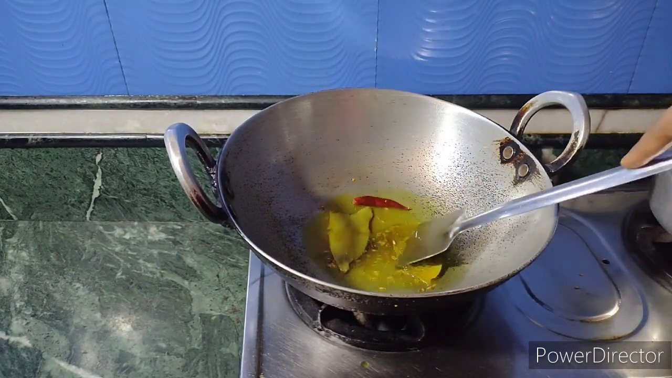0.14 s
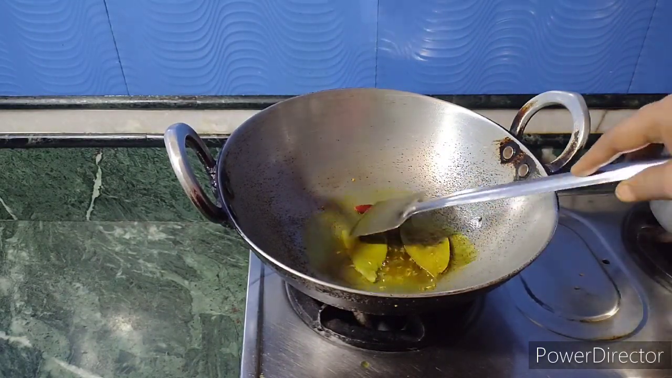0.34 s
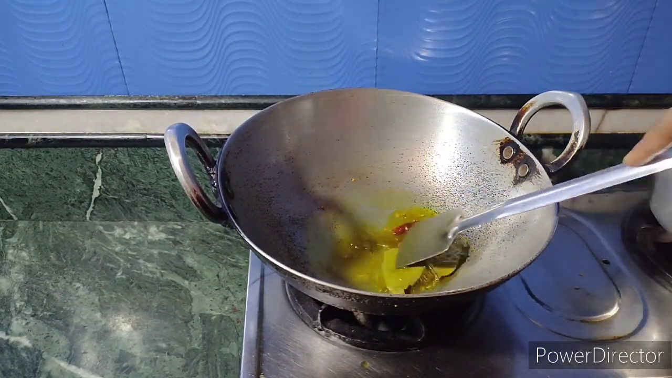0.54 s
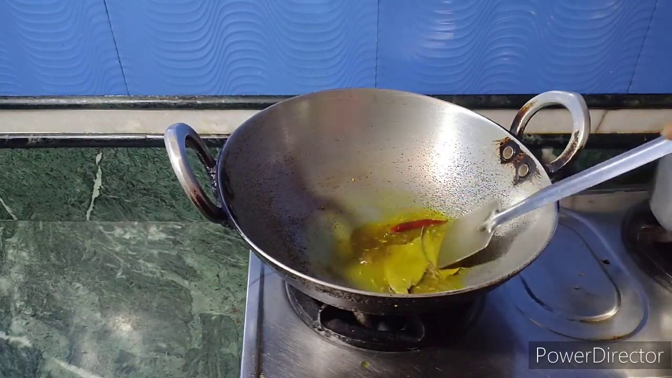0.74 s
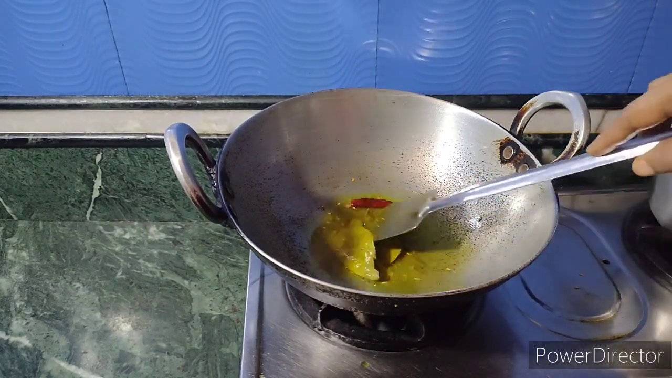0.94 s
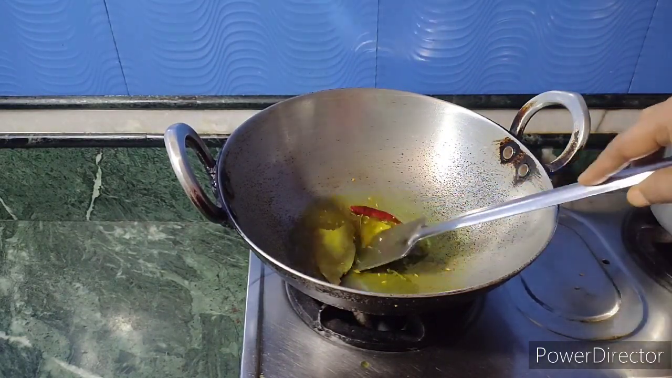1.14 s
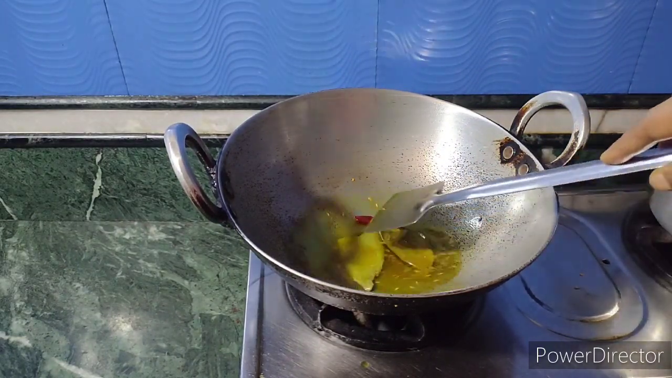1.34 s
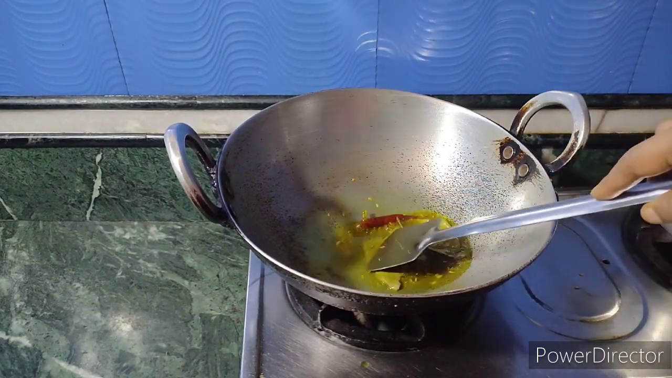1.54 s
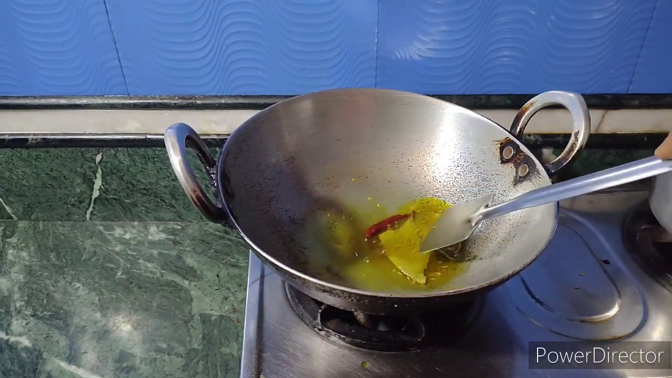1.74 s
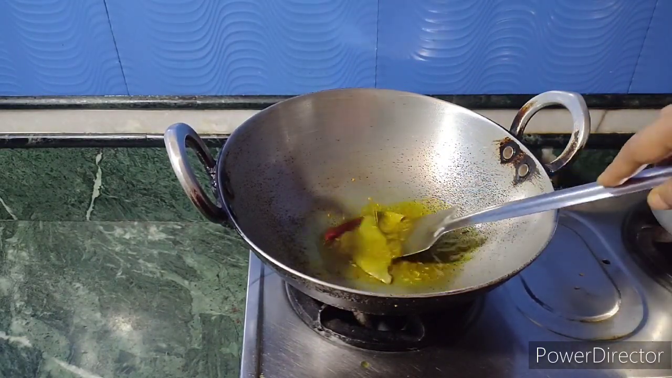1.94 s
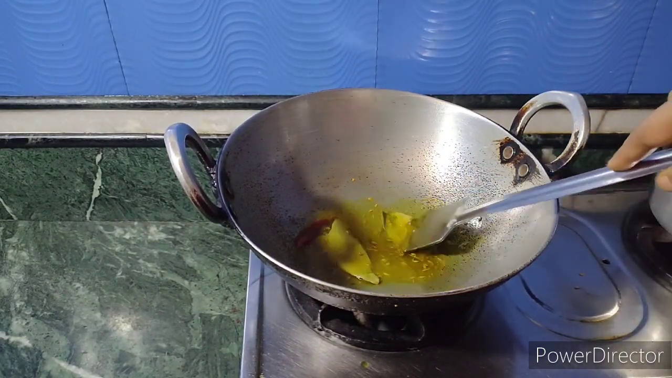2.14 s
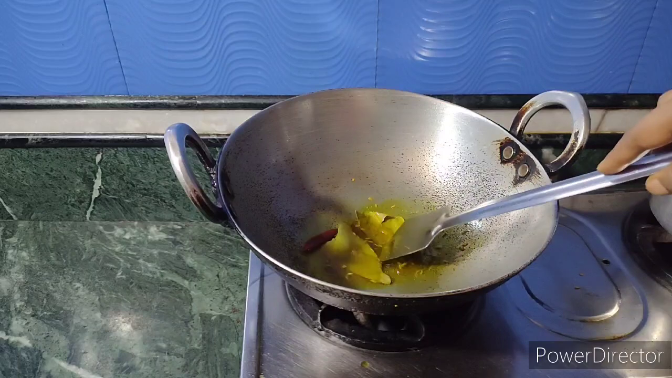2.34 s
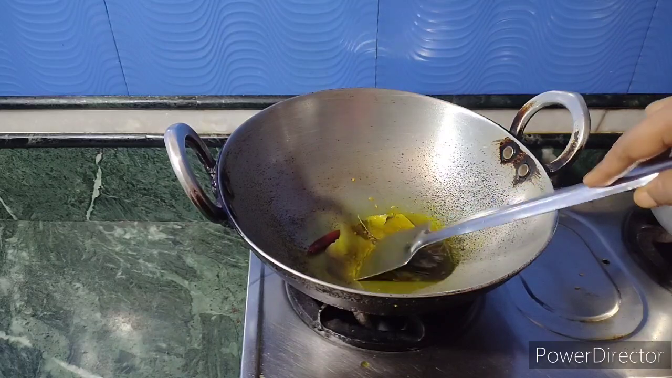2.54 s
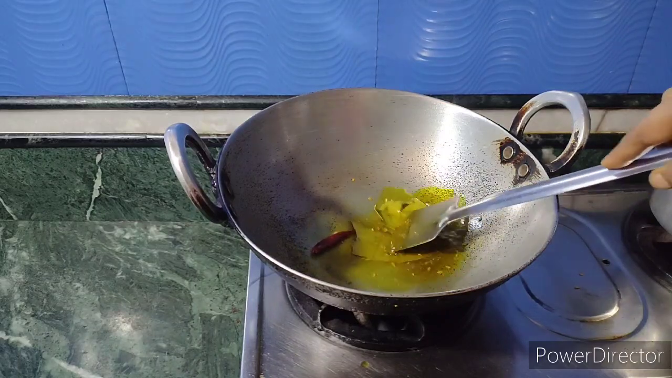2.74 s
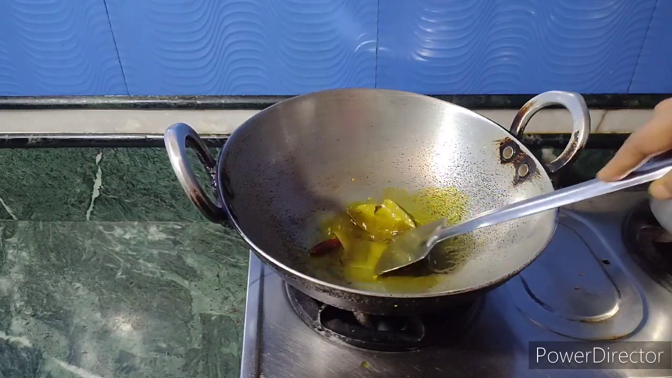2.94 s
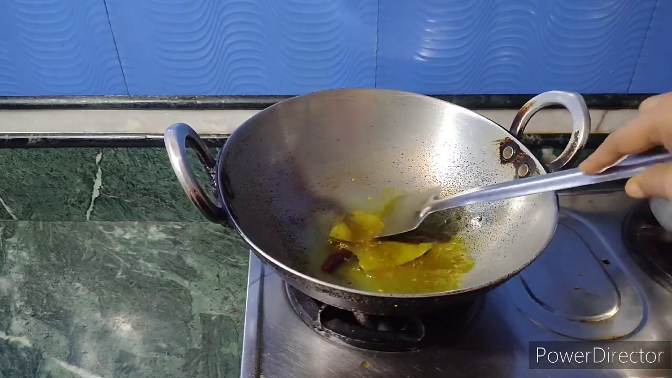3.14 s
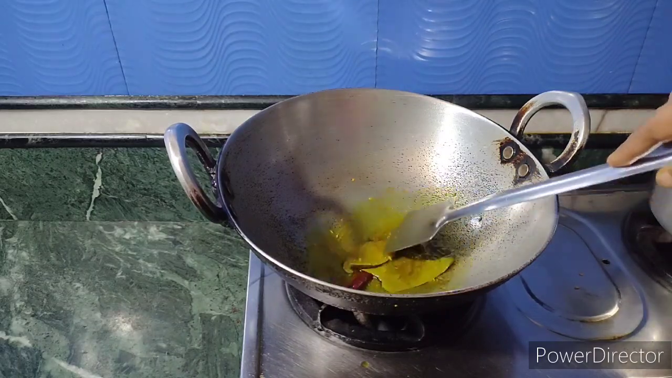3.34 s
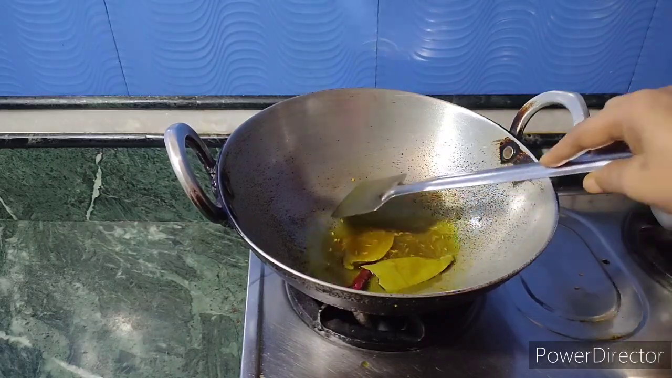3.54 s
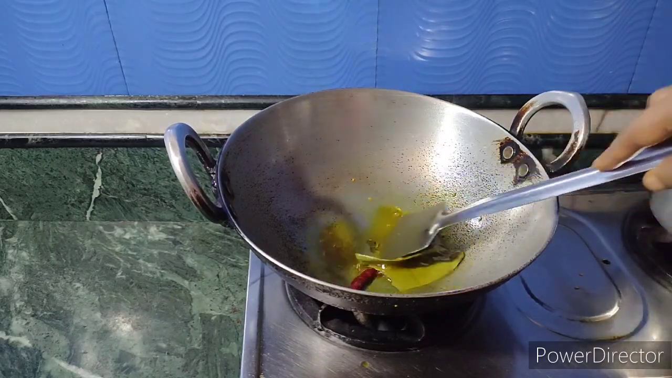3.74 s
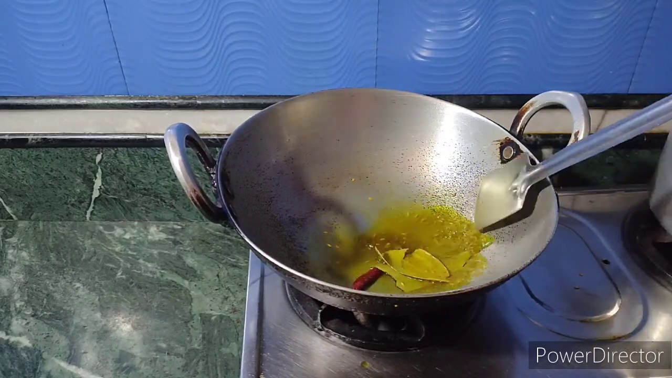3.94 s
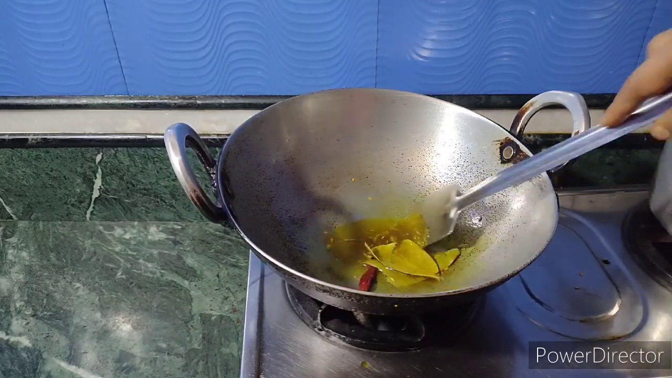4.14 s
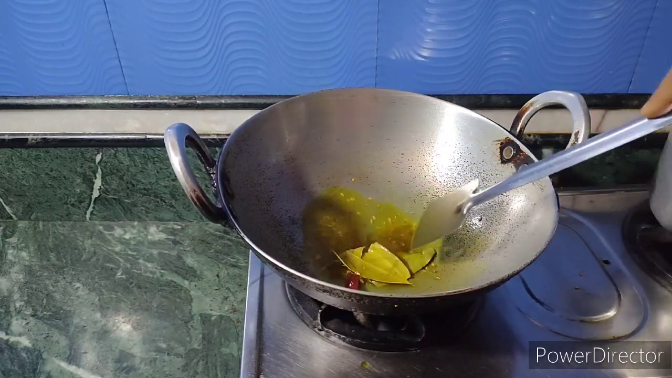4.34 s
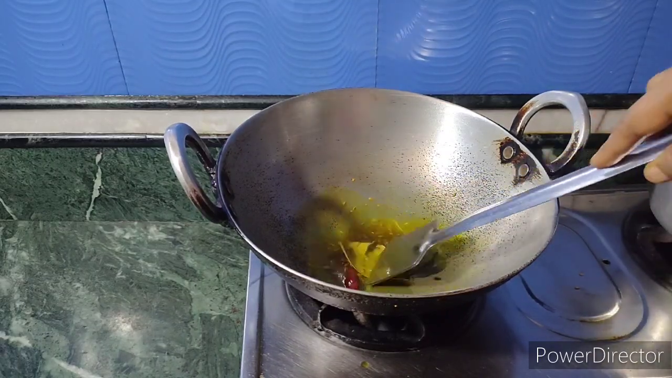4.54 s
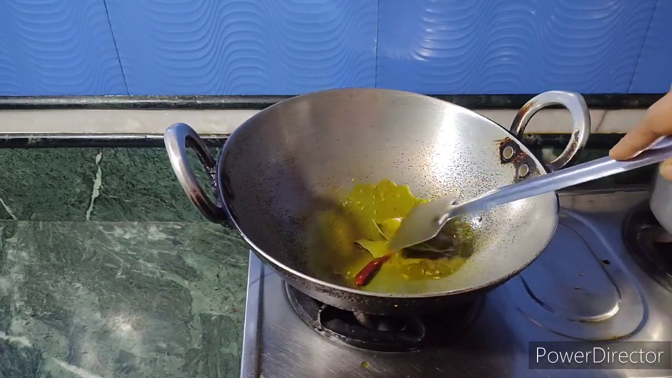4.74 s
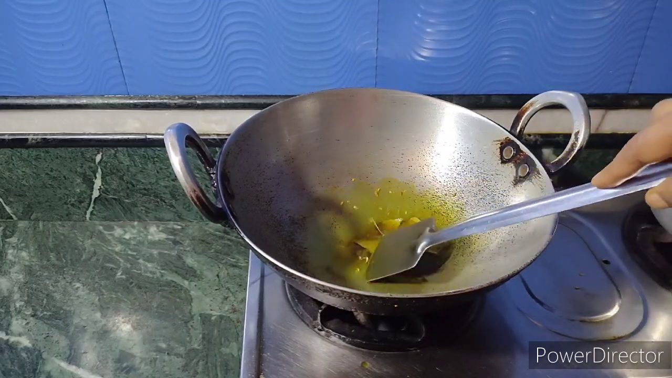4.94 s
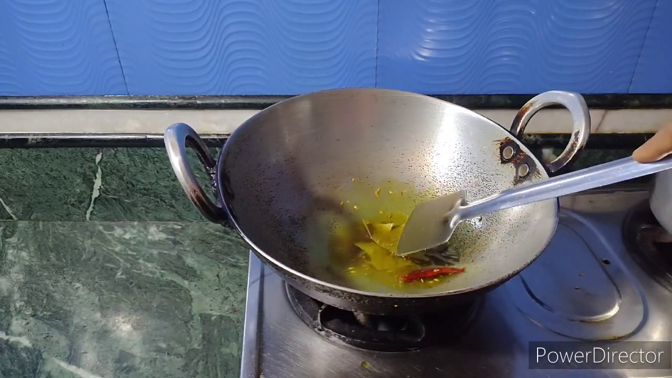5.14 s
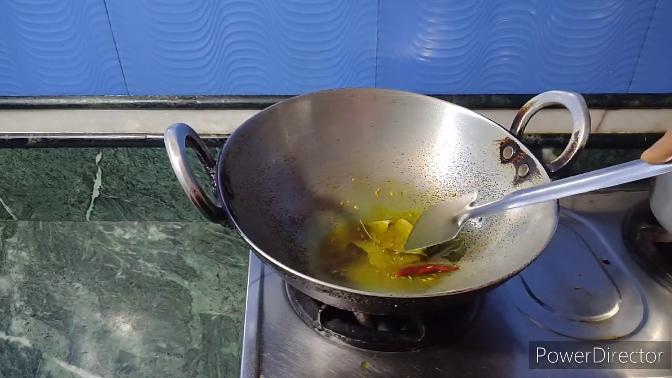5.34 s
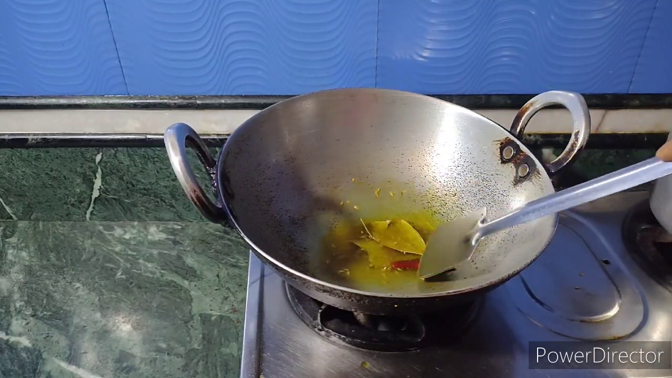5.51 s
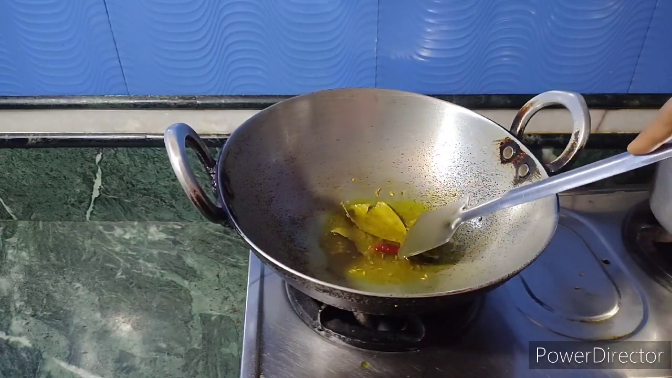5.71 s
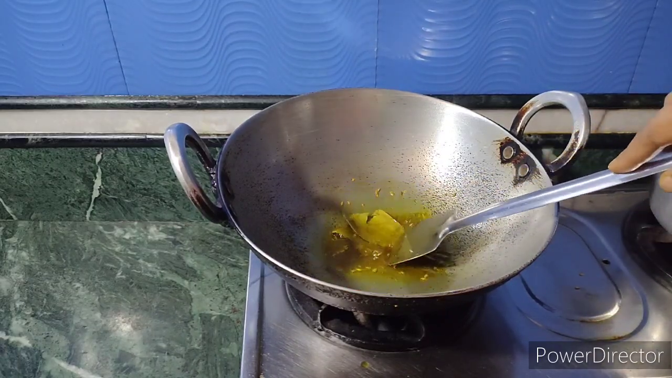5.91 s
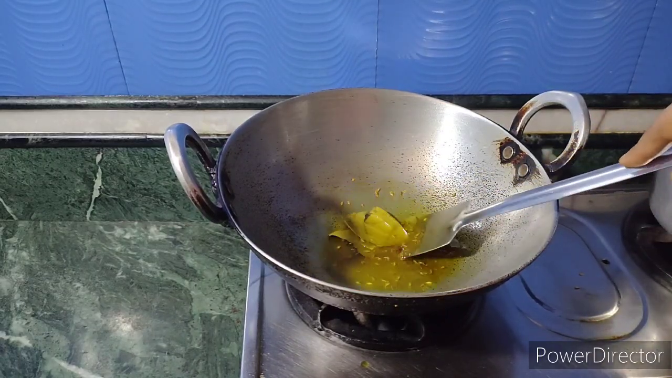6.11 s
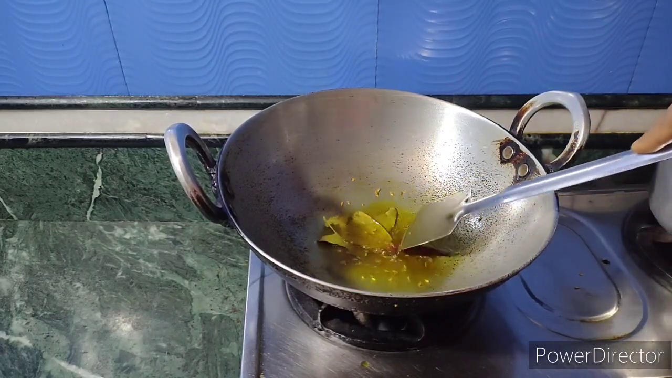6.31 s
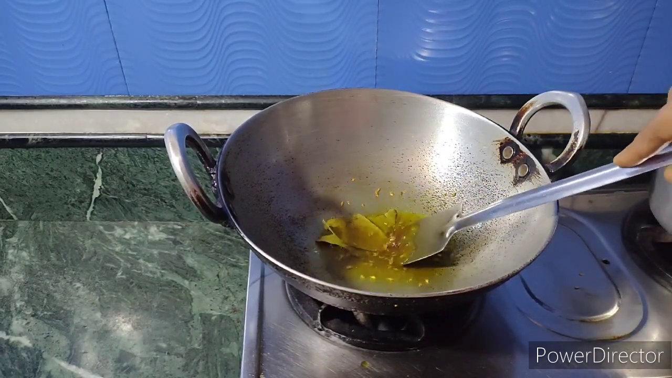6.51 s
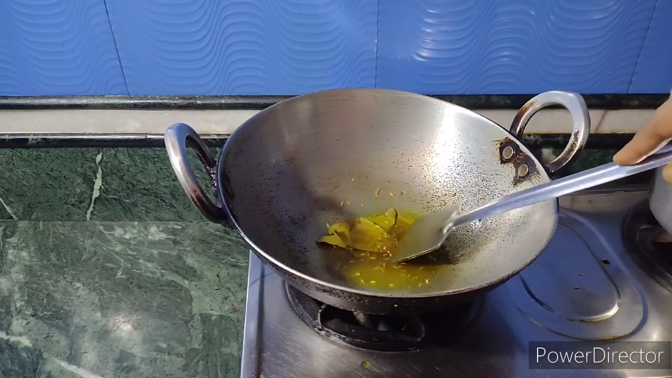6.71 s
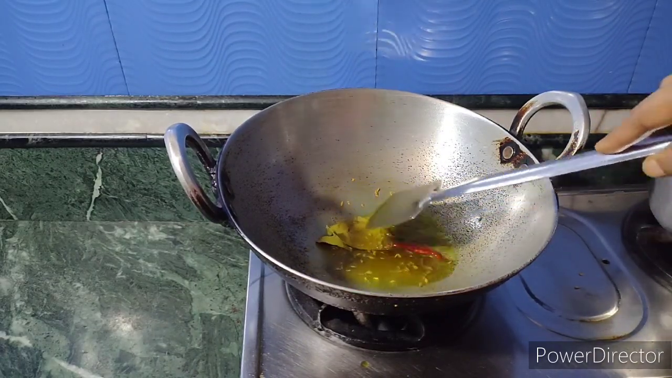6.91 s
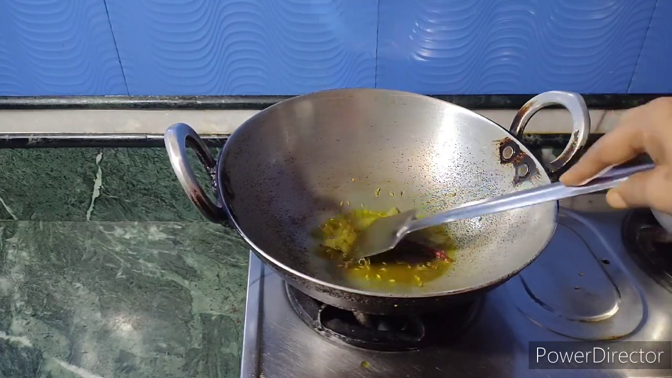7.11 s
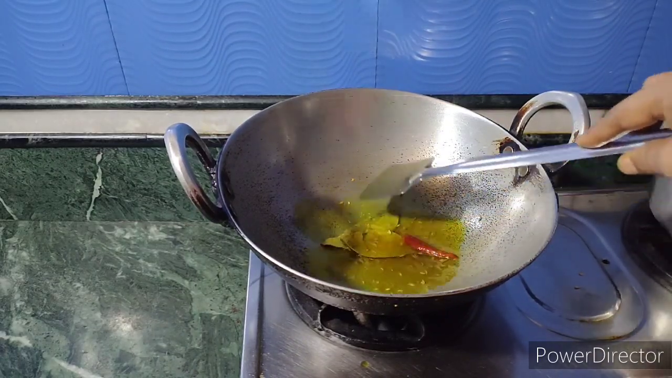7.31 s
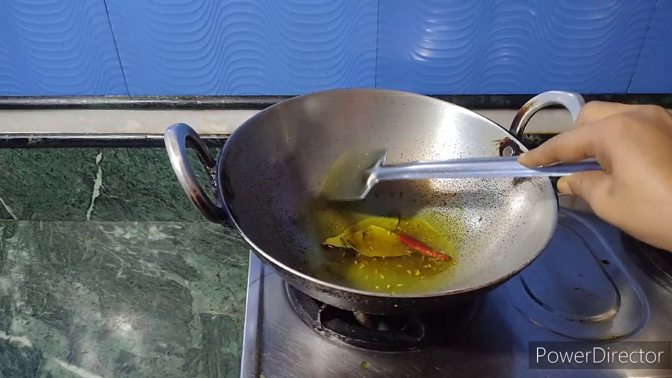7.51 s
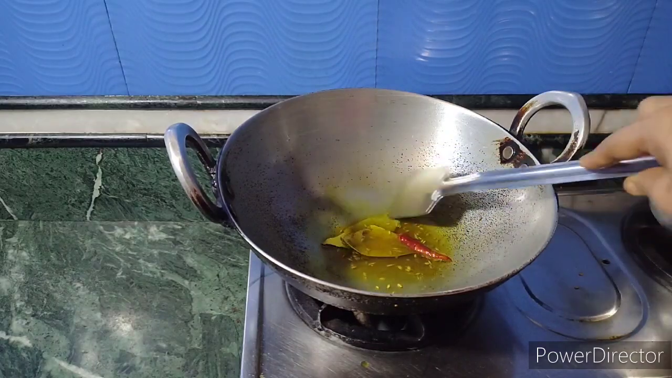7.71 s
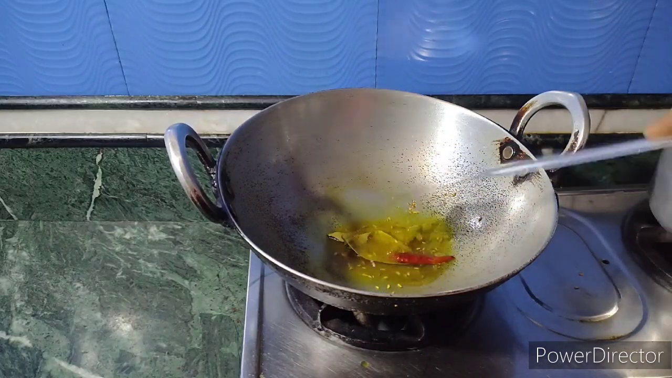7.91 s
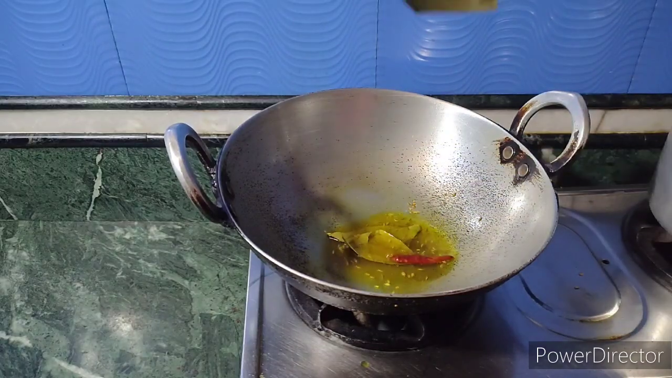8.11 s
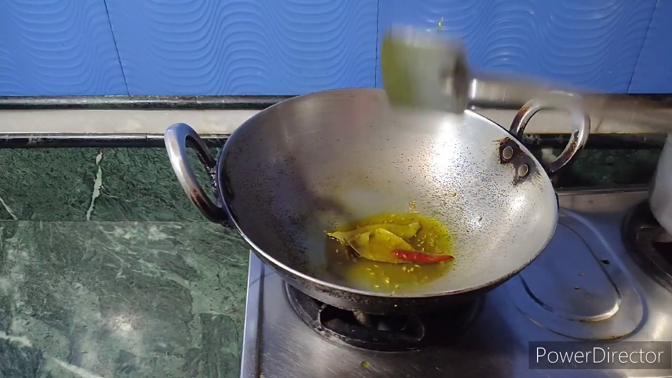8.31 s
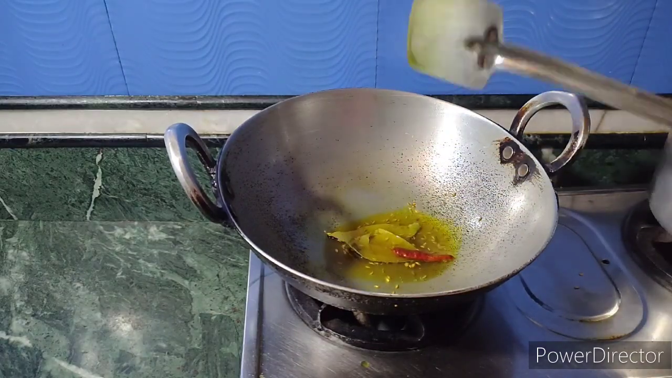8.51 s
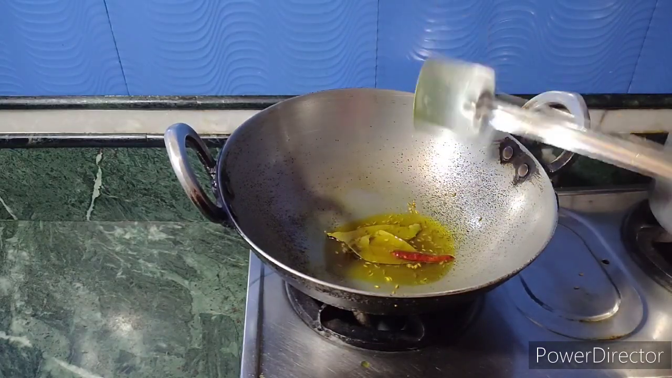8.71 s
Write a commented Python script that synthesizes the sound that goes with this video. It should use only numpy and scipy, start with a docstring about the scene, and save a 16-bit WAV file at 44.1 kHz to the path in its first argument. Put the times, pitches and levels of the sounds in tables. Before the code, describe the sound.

Frying is already under way at 0 s: a dense, bright, crisp sizzle of fine fizz and larger bubbles, with deep wet splutters and seed snaps in the first second. A short dry scrape opens it, and soft low metallic hums from the rubbing spatula appear until about 2.2 s. A dull, hollow knock falls at 1.6 s, clearer clinks at 2.7 and 3.2, a strong bright clank at 3.7, and a close pair around 4.1 with a scrape. Further taps come at 5.0, 5.4, 5.7, a faint one at 6.2, and 6.6, with faint oily swishes between 4.6 and 7.5. Meanwhile the sizzle thins into separate crackling pops. The strongest knock, at 7.7, rings more freely and runs into a rasping scrape and low hum until 8. Then only sparse tiny pops remain over very faint room noise and hum. Close stereo, small kitchen, short metallic echo.

```python
"""A dense sizzle comes first: spices fry in a little oil in a steel wok, then thin out into single pops.
Fizz, bubbles and splutters are many tiny damped tones; seeds snap as short bursts of coloured noise.
A steel spatula knocks, rubs and scrapes: noise bursts, ringing steel modes, tiny slips and gliding hums.
Fading noise stands for the echo of wok and kitchen; faint room noise and mains hum lie underneath.
Two close microphone ports (left and right) colour the treble differently."""
import sys
import numpy as np
from scipy import signal
from scipy.fft import rfft, irfft, next_fast_len
from scipy.io import wavfile
from scipy.ndimage import uniform_filter1d

SR = 44100
rng = np.random.default_rng(int(sys.argv[2]) if len(sys.argv) > 2 else 0)


def unload_audio(sound):
    """Save the sound as a 16-bit wav file, at the path given as the first command line argument."""
    columns = np.transpose(np.atleast_2d(sound))
    # keep every value between -1 and 1, then stretch to whole-number steps
    steps = np.round(np.clip(columns, -1, 1) * 32767)
    wavfile.write(sys.argv[1], SR, steps.astype(np.int16))


N = 386316  # length in samples

# How hard the water boils out of the spices: t/s, level/dB
BOIL = [(0.0, -47), (1.61, -51), (3.68, -53), (4.17, -52), (4.68, -59), (5.0, -53), (5.41, -61),
        (5.63, -66), (5.8, -57), (6.17, -64), (6.4, -60), (6.78, -62), (7.07, -71), (7.41, -59),
        (7.66, -73), (7.91, -58), (8.2, -74.5), (8.76, -80)]
FULL_BOIL_DB = -47
# Tone colour of fine fizz, larger bubbles, deep splutters and steady hiss: f/Hz, level/dB (per Hz)
FIZZ_COLOUR = [(2500, -37.5), (4200, -11.5), (4800, -3), (6000, -5), (6800, -1.5), (8400, -4), (9500, -8),
               (11000, -12), (13000, -7.5), (15500, -8)]
BUBBLE_COLOUR = [(300, -23.5), (650, -25), (850, -43), (1300, -26), (1600, -7), (1900, 1), (2400, 3),
                 (3200, 6.5), (3900, 6.5), (5000, -18.5)]
SPLUTTER_COLOUR = [(300, -26.5), (600, -18.5), (720, -14), (840, 1.5), (1000, -9), (1300, 1.5), (1700, 3),
                   (2500, -13.5)]
HISS_COLOUR = [(1500, -26.5), (4200, -18), (7300, 1), (12000, -21)]
# A weak boil fizzes less and pops more: offset from full boil (dB), dB lost per dB of boil
FIZZ_OFFSET_DB, FIZZ_FALL = 3.5, 1.17
# Bigger bubbles need more water, so they die away sooner: level at full boil (dB), dB lost per dB of boil
BUBBLE_DB, BUBBLE_FALL = -51.5, 1.6
SPLUTTER_DB, SPLUTTER_FALL = -63, 3.5


def sizzle():
    """Water boils out of the spices: fine fizz, larger bubbles, deep splutters and a faint steady hiss."""
    boil_db, = curves(BOIL)
    drop_db = boil_db - FULL_BOIL_DB
    fizz_db = FULL_BOIL_DB + FIZZ_OFFSET_DB + FIZZ_FALL * drop_db
    fine = bubbles(fizz_db, most_per_s=480, pitch_hz=7300, spread=0.22,
                   cycles=3, size_db=4.5, spectrum=FIZZ_COLOUR)
    large = bubbles(BUBBLE_DB + BUBBLE_FALL * drop_db, most_per_s=380, pitch_hz=2370, spread=0.28,
                    cycles=1.96, size_db=3.0, spectrum=BUBBLE_COLOUR)
    deep = bubbles(SPLUTTER_DB + SPLUTTER_FALL * drop_db, most_per_s=60, pitch_hz=1200, spread=0.33,
                   cycles=1.5, size_db=5, spectrum=SPLUTTER_COLOUR)
    hiss = amp(-74) * unit(coloured(rng.standard_normal((2, N)), HISS_COLOUR))
    return fine + large + deep + hiss


def bubbles(level_db, most_per_s, pitch_hz, spread, cycles, size_db, spectrum, count=160):
    """Many tiny bursts, each a few damped cycles (count samples long); quieter frying has fewer of them."""
    level_db = np.pad(level_db, (SR // 2, 0), "edge")  # the oil is already frying
    n = len(level_db)
    rate = most_per_s * amp(level_db - level_db.max()) ** 0.7
    start = np.flatnonzero(rng.random(n) < rate / SR)
    draw = rng.standard_normal((len(start), 3))  # pitch, size, place
    hz = np.clip(pitch_hz * np.exp(spread * draw[:, :1]), 500, 15000)
    size = amp(level_db[start] + size_db * np.clip(draw[:, 1], -2, 1.5)) / np.sqrt(rate[start])
    turns = hz * np.arange(count) / SR
    tones = np.sin(2 * np.pi * turns) * np.exp(-turns / cycles)
    grains = size[:, None] * np.sqrt(hz) * tones
    out = np.zeros((2, n))
    # three spots in the oil, each with its own echo
    for spot in np.array_split(np.argsort(draw[:, 2]), 3):
        places = (start[spot, None] + np.arange(count)).ravel()
        dry = np.bincount(places, grains[spot].ravel(), n + count)[None, :n]
        echo = answer(direct=11, wok_t60=0.1, room_db=-8, room_t60=0.45)
        out += signal.oaconvolve(dry, echo, axes=1)[:, :n]
    overall = np.sqrt(np.mean(amp(level_db) ** 2))
    return (unit(coloured(out, spectrum)) * overall)[:, -N:]


# Bubbles that stand out of the sizzle: t/s, level/dB (before a 4 dB lift), f/Hz
BIG_POPS = [(.12, -65, 6740), (.4988, -59, 6900), (.535, -48.5, 6600), (.6404, -44.5, 2000),
            (.8144, -50, 2900), (.9063, -44.5, 6560), (1.0115, -49, 1890), (1.107, -45.5, 6400),
            (1.2667, -49, 3000), (1.272, -45, 6600), (1.3898, -50, 3160), (1.6972, -53, 2100),
            (2.2545, -45, 6700), (2.3734, -51, 2100), (2.5202, -48, 6550), (2.7869, -44, 6840),
            (3.3454, -49, 6400), (3.477, -50.5, 8400), (3.521, -52, 6900), (3.567, -49, 7240),
            (3.8724, -47, 5550), (4.0488, -44.5, 6800), (4.4693, -51, 6940), (4.5053, -50.5, 7650),
            (4.592, -51.5, 8030), (4.6145, -49.5, 6800), (4.7332, -52, 5600), (4.7496, -54.5, 3400),
            (4.8929, -48.5, 6340), (4.9516, -50, 6500), (4.972, -55, 3860), (5.155, -51, 7760),
            (5.39, -49, 6530), (5.798, -51.5, 6450), (6.03, -51, 7300), (6.054, -53.5, 2310),
            (6.192, -51.5, 6500), (6.2934, -55.5, 6540), (6.432, -56.5, 4850), (6.5332, -52.5, 6840),
            (6.759, -53.5, 7350), (6.8854, -52.5, 6200), (6.9845, -56.5, 6300), (7.1204, -55.5, 2430),
            (7.1447, -50.5, 6360), (7.2973, -53, 3100), (7.3304, -54, 7950), (7.365, -53.5, 5070),
            (7.4121, -50.5, 6560), (7.5645, -49.5, 7670), (7.9778, -53, 7650), (8.0546, -52, 8340),
            (8.5925, -59.5, 4140)]
# Dry snaps of spitting seeds: t/s, level/dB (before an 18.5 dB cut)
SEED_SNAPS = [(0.077, -29), (0.3213, -27), (3.55, -29.5), (5.339, -39), (6.389, -35), (6.8364, -40),
              (8.2081, -42)]
# The loudest deep splutters from under the leaves: t/s, level/dB, f/Hz
LEAF_SPLUTTERS = [(0.016, -55, 840), (.076, -51.5, 990), (0.3223, -51, 1590), (0.641, -57, 850),
                  (.934, -58, 1450), (2.919, -54.5, 1530), (3.1, -58, 1210)]
# Tone colour of a pop in the wok: f/Hz, level/dB (per Hz)
POP_COLOUR = [(1300, -32.5), (1900, 0.5), (3300, 3), (4000, -6), (5000, 2.5), (8500, 8), (11000, -10)]
# Tone colour of a sharp crack, for seeds and steel alike: f/Hz, level/dB (per Hz)
CRACK_COLOUR = [(2500, -32.5), (4100, -14.5), (4900, -1.5), (6000, 0), (7400, 1.5), (8600, 0), (10500, -12),
                (15500, -18.5)]


def pops():
    """A big bubble tears open and briefly rings at its cavity's pitch; a seed snaps; a leaf splutters."""
    out, t = np.zeros((2, N)), seconds(0.01)
    for s, db, hz in [*BIG_POPS, *stray_pops()]:
        cavity = np.cos(2 * np.pi * hz * t) * np.exp(-t / 0.00048)
        echo = answer(direct=3, wok_t60=0.075, room_db=-9, room_t60=0.48)
        pop = coloured(signal.fftconvolve(echo, cavity[None], axes=1), POP_COLOUR)
        add(out, s, amp(db + 4.0) * struck(pop))
    for s, db in SEED_SNAPS:
        echo = answer(direct=9, wok_t60=0.04, room_db=-9, room_t60=0.45)
        add(out, s, amp(db - 18.5) * struck(coloured(echo, CRACK_COLOUR)))
    for s, db, hz in LEAF_SPLUTTERS:
        echo = answer(direct=3.1, wok_t60=0.053, room_db=-3.0, room_t60=0.38)
        splat = coloured(echo, SPLUTTER_COLOUR)
        splat = filtered(splat, lambda f: amp(favour(f, hz, boost_db=6, octaves=0.45)))
        add(out, s, amp(db) * struck(splat))
    return out


# Stray pops: rate at full boil, level against the boil (before the pops' 4 dB lift) and its scatter
STRAY_PER_S, STRAY_DB, STRAY_SCATTER_DB = 6, -1, 1.5
# Their middle pitch and its relative spread
STRAY_HZ, STRAY_SPREAD = 6470, 0.13


def stray_pops(count=80):
    """Pops at random moments, fewer and fainter as the boil weakens: t/s, level/dB, f/Hz."""
    when, chance = rng.random((count, 2)).T
    size, detune = rng.standard_normal((count, 2)).T
    slot_s = N / SR / count  # at most one pop in each slot
    s = (np.arange(count) + when) * slot_s
    boil_db = np.interp(s, *np.transpose(BOIL))
    bursts = chance < STRAY_PER_S * amp(boil_db - FULL_BOIL_DB) ** 1.4 * slot_s
    level_db = boil_db + STRAY_DB + STRAY_SCATTER_DB * size
    hz = STRAY_HZ * np.exp(STRAY_SPREAD * detune)
    return np.column_stack([s, level_db, hz])[bursts]


# Spatula blows: t/s, level/dB (reference for the blow's parts), clank level/dB and boom level/dB
# (both relative to it), strongest clank f/Hz, strongest boom f/Hz, pressure after the blow (0-1)
SPATULA_BLOWS = [(1.6077, -49.5, 3.5, 3, 1950, 586, 0.93), (2.6758, -32.5, -9.5, -13.5, 2250, 460, 0.88),
                 (3.2333, -34.5, -12.5, -17.5, 1530, 486, 0.98),
                 (3.7121, -25.5, -11, -18.5, 3000, 535, 0.66), (4.073, -31, -18.5, -30, 2940, 517, 0.83),
                 (4.1801, -27.5, -17.5, -18.5, 2600, 490, 0.99), (5.047, -32.5, -13, -16, 2480, 456, 0.99),
                 (5.359, -37.5, -9, -15, 2510, 440, 1), (5.662, -29, -13.5, -19, 3440, 423, 1),
                 (6.191, -48, -12, -27, 2940, 458, 0.93), (6.6043, -29.5, -10, -17, 2370, 415, 0.66),
                 (7.69, -24.5, -15.5, -16.5, 1780, 263, 0.09)]
# Ringing pitches (modes) of the wok's bowl, the spatula blade and the wok's upper wall: f/Hz, level/dB
# (only the balance within each list counts)
BOWL_MODES = [(214, -15), (294, -3), (315, 2), (330, -5), (412, -9), (441, -4), (460, 1), (478, -4),
              (520, -7), (544, -1), (568, 0), (598, -9), (707, -1), (724, -5), (785, -4), (945, -6),
              (1050, -8)]
BLADE_MODES = [(1222, -7), (1830, -7), (1890, -4), (2266, -8), (2536, -7), (2799, -9), (2982, -10),
               (4095, -1), (4135, -1), (4640, -5), (4935, 2), (5063, -1), (5458, -2), (5990, -3),
               (6756, -2), (7049, 0), (7255, 3), (7499, 5), (7962, 2), (8222, 1), (8330, 2), (8523, 2),
               (9609, -5)]
WALL_MODES = [(1290, -81.5), (1728, -79.5), (1809, -79), (1960, -81), (2078, -79), (2175, -82.5),
              (2280, -76), (2347, -78.5), (2430, -66.5), (2570, -87), (2724, -71), (2902, -80.5),
              (3074, -71), (3190, -67), (3321, -75), (3585, -78.5)]
# Tone colour of the rattling clank and of the low thud: f/Hz, level/dB (per Hz)
CLANK_COLOUR = [(200, -30), (450, -15.5), (950, -10.5), (1400, -3), (1850, -4.5), (2400, -2), (3200, 3),
                (3800, -10.5), (5000, -28)]
THUD_COLOUR = [(30, -24), (130, -16.5), (230, -14.5), (310, 4.5), (390, 8), (560, 11.5), (750, -3.5),
               (1000, -6), (2000, -39.5)]
# Time to fade by 60 dB without pressure (s)
BOWL_T60, BLADE_T60, WALL_T60 = 0.46, 0.31, 0.37
# Crack and blade ring (dB against the blow's level); a pressed blade loses some of its own ring (dB)
CRACK_DB, BLADE_DB, PRESS_MUTES_DB = -6.5, -10.5, 5
# Rattle and wall ring (dB against the clank), thud and bowl ring (dB against the boom)
RATTLE_DB, WALL_DB, THUD_DB, BOWL_DB = -5.5, -4.5, -8.5, -3.5
# The blade chatters: it grazes the steel before a pressed blow and rebounds after each:
# gap (s), levels (dB against the crack)
CHATTER_S, GRAZE_DB, REBOUND_DB = 0.007, -13, -5


def blows():
    """Steel on steel: a bright crack, the ring of blade and wall, and the slower boom of the bowl."""
    out = np.zeros((2, N))
    for s, db, clank_db, boom_db, clank_hz, boom_hz, press in SPATULA_BLOWS:
        graze = amp(GRAZE_DB) * press ** 10
        for delay, gain in [(-CHATTER_S, graze), (0, 1), (CHATTER_S, amp(REBOUND_DB))]:
            echo = answer(direct=2.5, wok_t60=0.08, room_db=-9.5, room_t60=0.48)
            crack = struck(coloured(echo, CRACK_COLOUR))
            add(out, s + delay, amp(db + CRACK_DB) * gain * crack)
        rattle = coloured(answer(direct=1.5, wok_t60=0.14, room_db=15, room_t60=0.44), CLANK_COLOUR)
        rattle = filtered(rattle, lambda hz: amp(favour(hz, clank_hz, boost_db=7.5, octaves=0.14)))
        thud = coloured(answer(direct=2.4, wok_t60=0.093, room_db=-1.5, room_t60=0.41), THUD_COLOUR)
        boom = ringing(BOWL_MODES, BOWL_T60, boom_hz, boost_db=8.5, press=press)
        swell = 1 - np.exp(-np.arange(boom.shape[1]) / SR / 0.0067)
        blade = ringing(BLADE_MODES, BLADE_T60, clank_hz, boost_db=3, press=press)
        wall = ringing(WALL_MODES, WALL_T60, clank_hz, boost_db=6.5, press=press)
        add(out, s, amp(db + BLADE_DB - PRESS_MUTES_DB * press) * blade)
        add(out, s, amp(db + clank_db + RATTLE_DB) * struck(rattle))
        add(out, s, amp(db + clank_db + WALL_DB) * wall)
        add(out, s, amp(db + boom_db + THUD_DB) * struck(thud))
        add(out, s, amp(db + boom_db + BOWL_DB) * boom * swell)
    return out


# A blade pressed to the wok: added damping, relative detuning, extra scatter of mode levels (dB)
PRESS_DAMPS, PRESS_DETUNES, PRESS_SCATTER_DB = 0.3, 0.012, 3.5


def ringing(modes, t60, centre_hz, boost_db, press):
    """Steel modes fade together, reaching each port at their own phase; pressure damps and detunes them."""
    t = seconds(0.8)
    hz, db = np.transpose(modes)
    press = np.clip(press, 0, 1)
    hz = hz * (1 + PRESS_DETUNES * press * rng.standard_normal(len(hz)))
    t60 = t60 / (1 + PRESS_DAMPS * press)
    db = db + favour(hz, centre_hz, boost_db, octaves=0.17)
    waves = amp(db[:, None] - 60 * t / t60) * np.exp(2j * np.pi * hz[:, None] * t)
    weights = amp((2 + PRESS_SCATTER_DB * press) * rng.standard_normal((2, len(hz))))
    # long waves arrive in step, short ones do not
    phases = rng.random(len(hz)) + rng.normal(0, 1, (2, len(hz))) * hz / 18000
    strength = np.sqrt(np.mean(np.sum((weights * amp(db)) ** 2, axis=1)) / 2)
    return (weights * np.exp(2j * np.pi * phases) @ waves).imag / strength


# The blade drags over the steel: t/s, length/s, level/dB (reference), bowl rumble level/dB (relative)
DRY_SCRAPES = [(0, 0.085, -51.5, -13.5), (2.029, 0.079, -52.5, -18.5), (4.084, 0.18, -55.5, -21),
               (6.2, 0.098, -60, -20), (7.702, 0.24, -56, -7.5), (7.871, 0.056, -47.5, -24),
               (7.959, 0.036, -53, -38)]
# After some pops the wok rings on, a rough swell near 2.3 kHz: t/s, length/s, level/dB
WOK_TAILS = [(4.65, .24, -64), (5.9, .16, -65), (6.06, .14, -66), (6.36, .21, -65), (7.1, .17, -68),
             (7.29, .19, -64)]
# Tone colour of that ringing: f/Hz, level/dB (per Hz)
TAIL_COLOUR = [(1500, -30), (2000, -6), (2330, 2), (2700, -7), (4000, -16)]
# The blade rubs one bowl mode into a hum: t/s, length/s, f/Hz, level/dB (before a 1.5 dB cut),
# pitch glide from start to end (relative)
HUMMING_RUBS = [(.03, 0.19, 460, -70, 0), (0.975, 0.18, 211, -65.5, -.05), (1.04, .25, 820, -76, -.04),
                (1.22, 0.3, 455, -65, .08), (1.59, .24, 216, -70, 0), (1.94, 0.2, 327, -73.5, 0),
                (1.93, 0.28, 464, -69, .04), (7.69, .2, 215, -66, 0), (7.74, .19, 298, -60, 0),
                (7.86, 0.21, 314, -64, 0)]


def strokes():
    """Tiny slips of the blade shake the bowl: dry, it rasps; oiled, it makes one mode hum. After some pops the
    wok rings on."""
    out = np.zeros((2, N))
    for s, length, db, rumble_db in DRY_SCRAPES:
        samples = int(length * SR)
        echo = answer(direct=8.3, wok_t60=0.18, room_db=-10.5, room_t60=0.46)
        shake = signal.fftconvolve(slips(length), echo, axes=1)
        for spectrum, gain_db in [(CRACK_COLOUR, -3), (CLANK_COLOUR, -9), (THUD_COLOUR, rumble_db)]:
            rasp = coloured(shake, spectrum)
            add(out, s, amp(db + gain_db) * rasp / rasp[:, :samples].std())
        # the blade rings along, its lowest mode favoured
        blade = ringing(BLADE_MODES, BLADE_T60, BLADE_MODES[0][0], boost_db=4, press=0)
        ring = signal.fftconvolve(slips(length), blade, axes=1)
        add(out, s, amp(db + rumble_db / 2) * ring / ring[:, :samples].std())
    for s, length, db in WOK_TAILS:
        echo = answer(direct=4.7, wok_t60=0.094, room_db=-15, room_t60=0.24)
        shake = signal.fftconvolve(slips(length), echo, axes=1)
        swish = coloured(shake, TAIL_COLOUR)
        add(out, s, amp(db) * swish / swish[:, :int(length * SR)].std())
    for s, length, hz, db, glide in HUMMING_RUBS:
        t = seconds(length)
        pitch = hz * (1 + glide * (t / length - 0.5))
        phase = np.cumsum(2 * np.pi * pitch / SR + 0.04 * rng.standard_normal(len(t)))
        # the grip wavers, smoothed over 20 ms
        grip = amp(3 * unit(uniform_filter1d(rng.standard_normal(len(t)), SR // 50)))
        swell = np.sin(np.pi * t / length) ** 2
        add(out, s, amp(db - 1.5) * grip * swell * np.sin(phase))
    return out


def slips(length):
    """The tiny catches that drive one stroke or ringing tail, about 900 a second, uneven in size, swelling and
    fading."""
    t = seconds(length)
    sizes = rng.standard_normal(len(t)) * amp(5 * rng.standard_normal(len(t)).clip(-2, 1.5))
    catches = rng.random(len(t)) < 900 / SR
    return (sizes * catches * np.sin(np.pi * t / length))[None]


# Tone colour of the room noise: f/Hz, level/dB (per Hz)
ROOM_COLOUR = [(20, -27.5), (48, 4.5), (80, -4.5), (200, -4.5), (500, -6), (1200, -15.5), (4000, -39),
               (15000, -27)]


def kitchen():
    """Faint room noise, coloured from random samples, and mains hum, a steady low sine."""
    hum = amp(-96) * np.sin(2 * np.pi * 49.5 * np.arange(N) / SR)
    return amp(-89.0) * unit(coloured(rng.standard_normal((2, N)), ROOM_COLOUR)) + hum


def answer(direct, wok_t60, room_db, room_t60):
    """A fresh stereo echo: direct sound, quick reflections in the wok, then the kitchen."""
    t = seconds(0.5)
    wok = amp(-60 * t / wok_t60)
    room = amp(room_db - 60 * t / room_t60)
    echo = rng.standard_normal((2, len(t))) * np.hypot(wok, room)
    echo[:, 0] += direct
    return echo


def favour(hz, centre_hz, boost_db, octaves):
    """Lift the pitches near one centre, as the place of contact favours some modes; result in dB."""
    return boost_db * np.exp(-0.5 * (np.log2((hz + 1) / centre_hz) / octaves) ** 2)


def coloured(x, spectrum, size=2048):
    """Stereo x through a filter with this spectrum that never sounds ahead of its input."""
    cepstrum = irfft(np.log(amp(along(spectrum, np.fft.rfftfreq(size, 1 / SR)))))
    # fold the second half onto the first: minimum phase
    cepstrum[1:size // 2] *= 2
    cepstrum[size // 2 + 1:] = 0
    kernel = irfft(np.exp(rfft(cepstrum)))
    return signal.fftconvolve(x, kernel[None], axes=1)[:, :x.shape[1]]


def filtered(x, response):
    """Multiply the spectrum of x by a response that depends on frequency."""
    m = next_fast_len(x.shape[-1] + SR // 10)
    return irfft(rfft(x, m) * response(np.fft.rfftfreq(m, 1 / SR)), m)[..., :x.shape[-1]]


def along(points, hz):
    """Read (f/Hz, value) points on a logarithmic frequency axis."""
    f, v = np.transpose(points)
    return np.interp(np.log(hz + 1), np.log(f), v)


def curves(rows):
    """One value per sample for each column after the time."""
    s, *columns = np.transpose(rows)
    return [np.interp(np.arange(N) / SR, s, c) for c in columns]


def amp(db):
    """Decibels to gain."""
    return 10 ** (np.asarray(db) / 20)


def unit(x):
    """Scale to an average strength (rms) of 1."""
    return x / np.sqrt(np.mean(x ** 2) + 1e-20)


def struck(x):
    """Scale so that the first 12 ms have rms 1."""
    return x / np.sqrt(np.mean(x[:, :SR // 80] ** 2) + 1e-20)


def seconds(length):
    """A time axis in seconds."""
    return np.arange(int(length * SR)) / SR


def add(track, s, sound):
    """Mix a sound in from time s on."""
    part = track[:, max(0, round(s * SR)):][:, :sound.shape[-1]]
    part += sound[..., :part.shape[1]]


# How alike the two ports hear each pitch: f/Hz, left-right correlation
PORT_LIKENESS = [(100, 0.93), (300, 0.86), (600, 0.043), (1200, 0.055), (4000, 0.0041)]


def scene():
    """Everything at the stove; long waves reach both ports alike, so the sides are blended in the bass."""
    both = sizzle() + pops() + blows() + strokes() + kitchen()

    def turn(hz):
        return np.arcsin(np.clip(along(PORT_LIKENESS, hz), -1, 1)) / 2

    own_side = filtered(both, lambda hz: np.cos(turn(hz)))
    other_side = filtered(both[::-1], lambda hz: np.sin(turn(hz)))
    return own_side + other_side


# How much louder the left port is than the right: f/Hz, level/dB
PORT_BALANCE = [(2500, 0.5), (4200, 1), (5600, 4.5), (6600, 10), (7400, 1.5), (8500, -11.5), (10000, -6),
                (12500, 0)]
TOP_HZ = 15600


def record(dry):
    """Each port favours its own treble band; nothing passes above the band limit."""
    def ports(hz):
        gains = amp(np.outer([0.5, -0.5], along(PORT_BALANCE, hz)))
        return gains / np.sqrt(np.mean(gains ** 2, axis=0)) * (hz < TOP_HZ)
    return filtered(dry, ports)


dry = scene()
out = record(dry)
unload_audio(out)
```